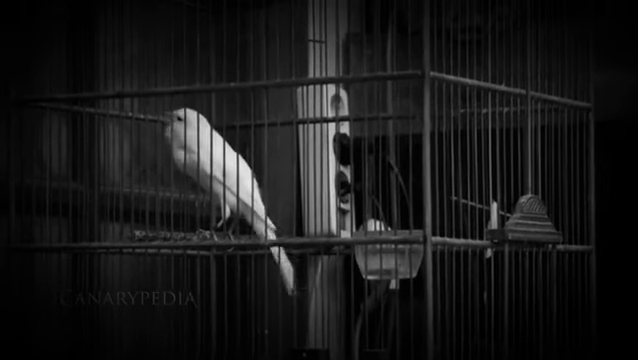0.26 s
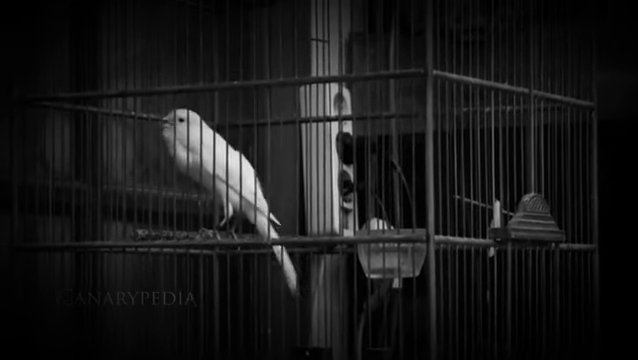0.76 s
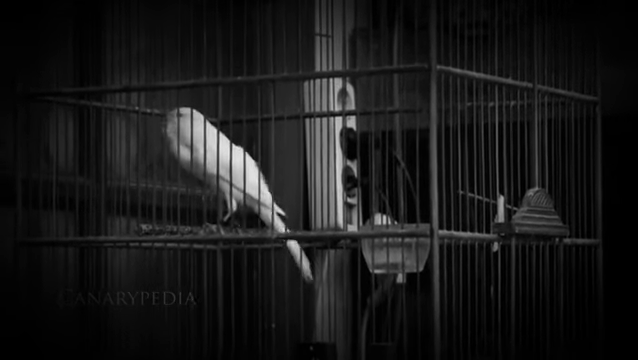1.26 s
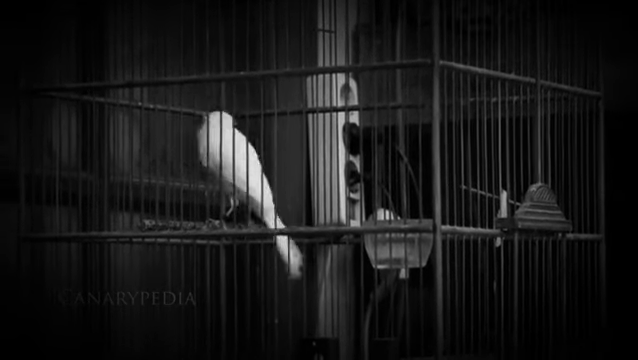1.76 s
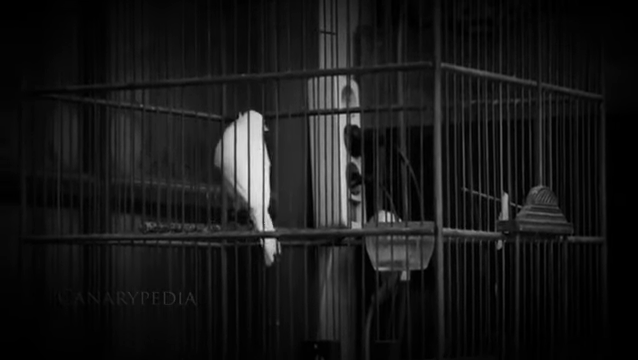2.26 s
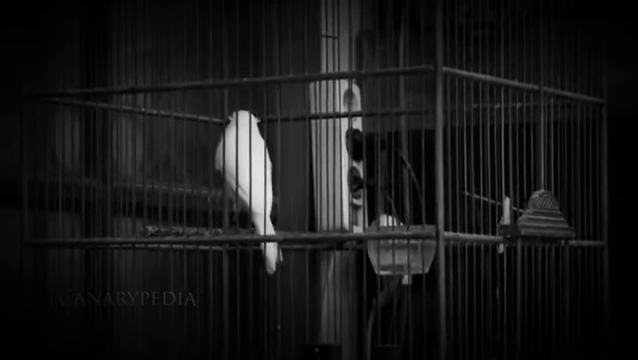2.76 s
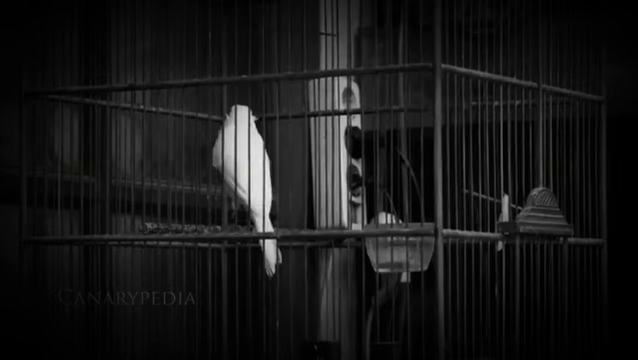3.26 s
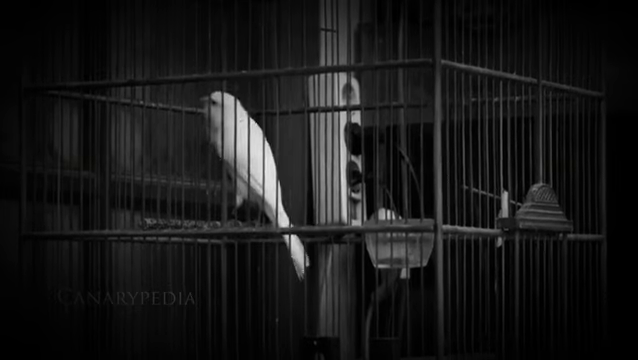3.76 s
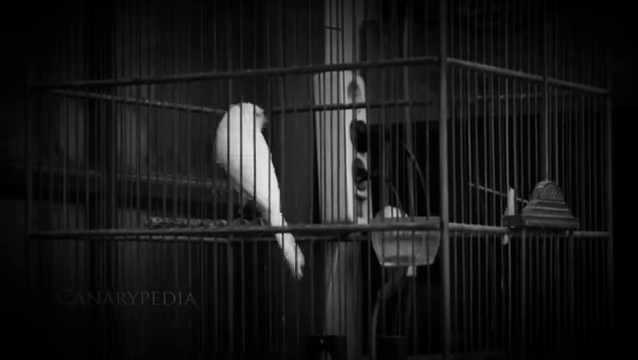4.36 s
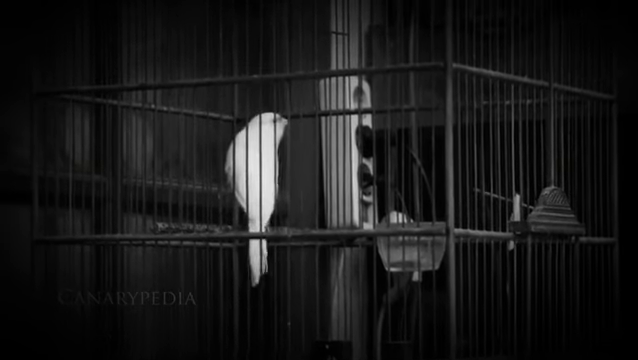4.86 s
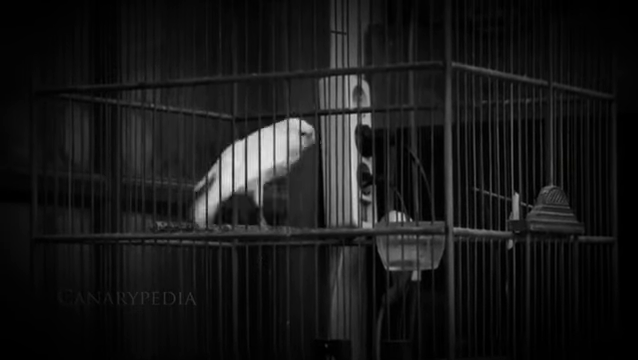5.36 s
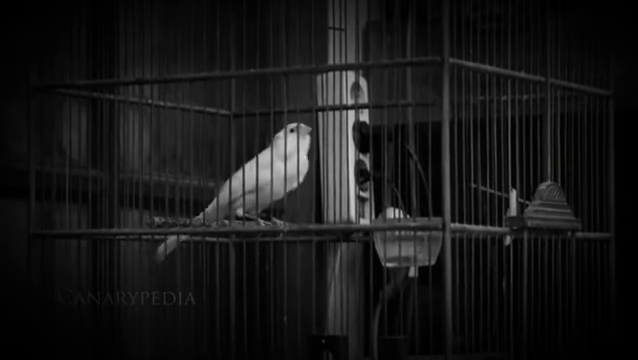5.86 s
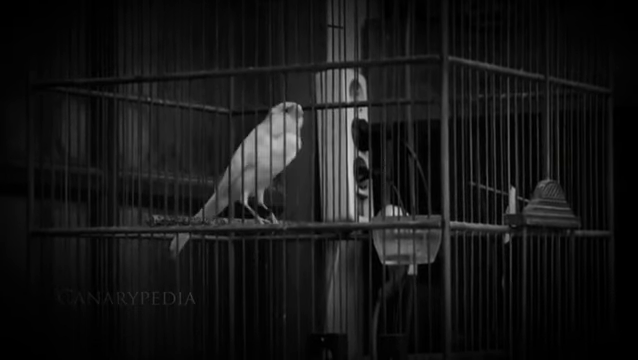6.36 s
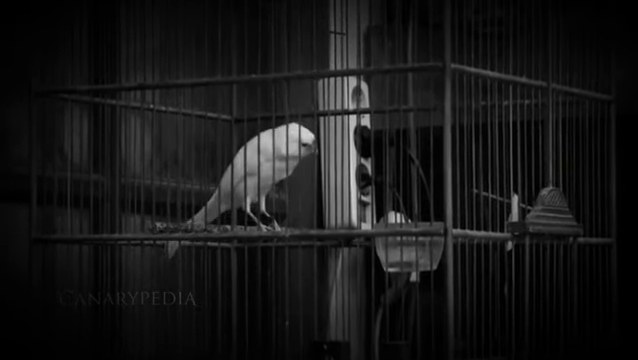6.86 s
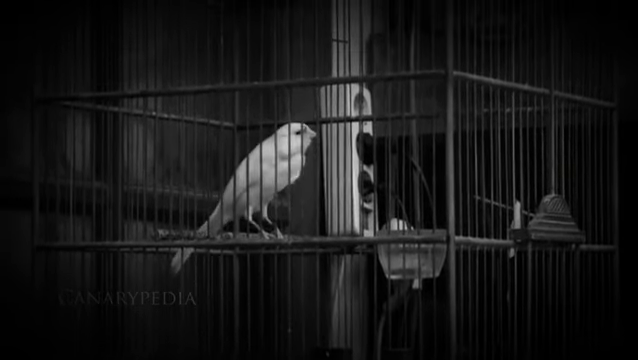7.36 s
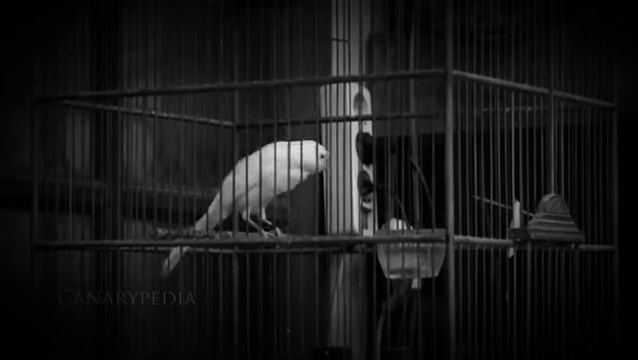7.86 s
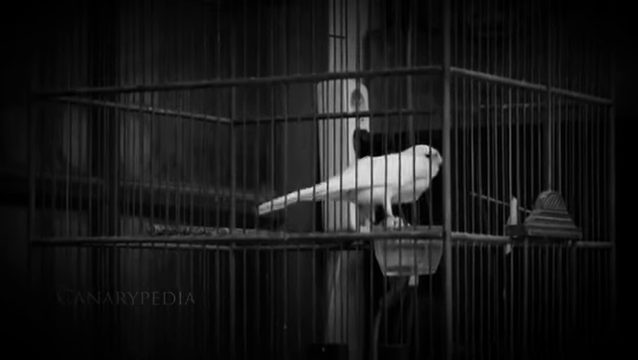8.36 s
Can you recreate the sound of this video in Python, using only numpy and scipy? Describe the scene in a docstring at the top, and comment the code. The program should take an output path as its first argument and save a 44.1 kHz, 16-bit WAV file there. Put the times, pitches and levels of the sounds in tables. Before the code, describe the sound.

Canaries sing in an echoing room, a rolling trill giving way to overlapping whistles, slides and buzzy calls over faint cage thumps.

```python
"""Canaries sing in a bare, echoing bird room: one rolls a falling trill, then many voices overlap in
whistles, slides and harsh buzzy calls, with a soft ticking roll in a lull and four upward slides to end.
Each note is a gliding near-sine, roughened by random pitch shake and rasping overtones.
Cages thump as birds hop on their perches. Shaped noise gives dull rustles, flickering treble chatter,
a far chorus and a low background rumble that swells in the gaps."""
import sys
import numpy as np
from scipy import signal
from scipy.fft import rfft, irfft, next_fast_len
from scipy.io import wavfile
from scipy.ndimage import uniform_filter1d

SR = 44100
rng = np.random.default_rng(int(sys.argv[2]) if len(sys.argv) > 2 else 0)


def pcm_store(signal):
    """Save signal as 16-bit PCM."""
    levels = np.round(np.clip(np.atleast_2d(signal), -1, 1) * 32767)
    wavfile.write(sys.argv[1], SR, levels.astype(np.int16).T)


N = 380141

TRILL_SYLLABLES = [(-0.052, 1), (0.068, -4), (0.182, -6), (0.296, -6.5), (0.412, -8.5), (0.53, -7),
                   (0.649, -6.5), (0.769, -8), (0.885, -8), (1.005, -9), (1.121, -7.5), (1.245, -7),
                   (1.368, -7.5), (1.501, -7.5)]  # the opening roll: t/s, level/dB
TRILL_DROP = [(0, 5800), (.02, 4947), (.046, 4163)]  # the dive that opens each syllable: t/s from its start, f/Hz
BUZZY_CALLS = [(-.01, 0.066, 5080, 4310, -11), (.054, 0.023, 1935, 3830, -12.5),
               (0.243, 0.18, 2760, 2927, -20.5), (0.489, 0.087, 3050, 3150, -24),
               (0.715, 0.094, 2896, 3220, -21.5), (0.888, 0.022, 2966, 3090, -21),
               (1.025, 0.037, 2510, 2630, -26.5), (1.174, 0.096, 2920, 2580, -32),
               (1.49, 0.054, 2780, 2976, -17), (1.737, .032, 5730, 5300, -11.5),
               (1.778, 0.03, 3560, 2466, -10.5), (1.803, 0.12, 3850, 4480, -15),
               (1.901, 0.12, 5500, 4750, -17.5), (1.981, 0.037, 2750, 2468, -17),
               (1.981, 0.094, 3810, 3770, -13), (2.246, 0.11, 4440, 6110, -18),
               (2.292, 0.047, 4600, 3000, -24), (2.345, 0.053, 4230, 4285, -10),
               (2.502, 0.063, 4620, 4420, -16.5), (2.512, 0.13, 2216, 3056, -22),
               (2.538, 0.11, 3680, 5260, -16), (2.669, 0.13, 2970, 4510, -15.5),
               (2.816, 0.11, 3590, 4910, -13), (2.846, 0.023, 2733, 2856, -15),
               (2.89, 0.066, 6860, 6800, -14), (2.934, 0.061, 5870, 4360, -11),
               (3.18, 0.077, 2505, 2226, -24.5), (3.222, .11, 4265, 2973, -22),
               (3.281, .15, 4860, 4440, -16), (3.467, 0.079, 5200, 3870, -23),
               (3.597, 0.14, 3850, 3510, -22.5), (3.743, .12, 2350, 2535, -31.5),
               (3.772, 0.08, 4825, 3800, -15.5), (3.945, 0.1, 3570, 5300, -10),
               (4.101, 0.06, 3946, 3600, -19), (4.161, 0.044, 6000, 5930, -18),
               (4.252, 0.02, 6610, 6540, -12.5), (4.291, 0.1, 3793, 2217, -21),
               (4.349, 0.081, 3720, 5140, -11.5), (4.404, 0.049, 6140, 5800, -10),
               (4.483, 0.077, 3766, 5220, -13), (4.745, 0.093, 3370, 3030, -18),
               (4.861, 0.077, 6070, 5730, -17.5), (4.924, 0.12, 5334, 4535, -13),
               (4.911, 0.055, 3250, 3260, -18), (5.079, 0.089, 4410, 3697, -16),
               (5.144, 0.027, 5260, 5370, -24.5), (5.292, 0.0089, 6620, 4960, -8),
               (5.329, 0.098, 4290, 6025, -9), (5.486, 0.068, 4395, 4180, -9.5),
               (6.283, 0.065, 3507, 3796, -24), (6.514, 0.073, 4810, 4910, -19),
               (6.596, 0.051, 5310, 5590, -18.5), (6.566, 0.13, 3255, 2910, -24),
               (6.642, 0.16, 5200, 3483, -15.5), (6.797, 0.038, 2053, 3015, -17),
               (6.851, 0.046, 4550, 4680, -6.5), (6.935, 0.06, 4025, 2427, -11),
               (6.995, 0.1, 4420, 3730, -14), (7.25, 0.084, 2800, 3137, -19),
               (7.26, 0.068, 5820, 5720, -16), (7.338, 0.1, 4510, 4914, -13),
               (7.498, 0.022, 5510, 5270, -12), (7.695, 0.022, 3705, 3295, -11),
               (7.782, 0.062, 2990, 2720, -16.5), (7.805, 0.15, 4880, 4560, -17.5),
               (8.264, 0.098, 5100, 4630, -24), (8.324, 0.057, 2723, 2525, -23.5),
               (8.445, 0.07, 3706, 4420, -10), (8.537, 0.052, 2466, 2757, -23.5)]  # harsh calls: t/s, length/s, first f/Hz, last f/Hz, level/dB
TWITTER_CURVES = [(0, -37.5, 2996, -11), (1.449, -36.5, 2987, 3), (1.622, -20.5, 3935, -7),
                  (1.75, -38, 3990, 12), (1.9, -20.5, 3543, -14), (2.2, -21, 3379, -6),
                  (2.549, -23, 4080, 7), (2.799, -24, 3813, 5), (3.1, -16.5, 3876, -1),
                  (3.398, -19.5, 4230, 6), (3.55, -30.5, 4180, -38), (3.7, -20, 3705, 3),
                  (4.052, -25, 4346, 3), (4.301, -21, 4298, 8), (4.652, -20, 3715, 1.5),
                  (4.852, -28, 3594, -18), (5.15, -25, 4600, -21), (5.452, -17.5, 4163, -18),
                  (5.62, -43, 3950, 1), (6.0, -43.5, 4186, 2), (6.45, -34.5, 3384, -9),
                  (6.648, -21, 4013, 12), (7.1, -21.5, 4506, -6), (7.199, -44, 4510, 6),
                  (7.449, -30.5, 3614, 15), (7.619, -32.5, 4000, 1), (7.851, -27.5, 4475, -25),
                  (8.1, -31.5, 4410, -4), (8.301, -28.5, 4193, 5.5), (8.62, -14, 3742, 6)]  # the flock's contour: t/s, level/dB, middle f/Hz, overtones/dB
CHATTER_FADER = [(0, -40), (.6, -44.5), (.8, -36), (1.1, -45), (1.6, -60.5), (2.9, -43), (3.55, -62),
                 (4.3, -52), (5.502, -32), (5.75, -89), (6.45, -79), (6.65, -55), (7.15, -70), (7.3, -39),
                 (7.7, -68), (8.62, -66)]  # sizzle above the song: t/s, level/dB
CHATTER_EQ = [(5500, -46), (6500, 13), (9000, 15), (12500, 18.5), (14000, -50)]  # its colour: f/Hz, level/dB
# swells of low background rumble and hum, mostly between calls: t/s, hold/s, rumble level/dB, hum level/dB
RUMBLE_SWELLS = [(.93, .1, -55.5, -77), (2.238, 0.041, -61.5, -42), (2.664, 0.052, -50, -43),
                 (3.11, 0.37, -89, -43), (3.664, 0.15, -37, -34.5), (4.812, 0.094, -38, -43),
                 (5.277, 0.026, -44.5, -37), (5.696, 0.42, -36.5, -45.5), (6.106, 0.32, -35.5, -52.5),
                 (7.202, 0.035, -40, -48), (7.53, 0.35, -43.5, -49.5)]
RUMBLE_EQ = [(76, -17), (130, -6), (183, -4), (252, -7.5), (322, -8), (615, -13.5), (900, -26),
             (1170, -29.5), (1980, -120)]  # the rumble's low body: f/Hz, level/dB
HUM_EQ = [(900, 15), (1050, 6), (1180, 8.5), (1420, 25), (1700, 20), (2200, 31.5), (3000, -18.5)]  # the midrange hum on top of it: f/Hz, level/dB
ROOM_TONE_EQ = [(15, -37), (25, 4), (103, 7.5), (241, -30), (554, -12.5), (1120, -14.5), (1740, -11),
                (1900, -10), (2470, -55), (4180, -120)]  # steady room tone: f/Hz, level/dB
FAR_CHORUS_EQ = [(1900, -30), (2500, -6), (3300, 0), (4200, -8), (4900, -10), (5400, -25), (9000, -40),
                 (13000, -60)]  # the blur of distant birds: f/Hz, level/dB
NOISE_WIDTH = [(50, 0.93), (400, 0.76), (1000, 0.66), (2500, 0.33), (8000, 0.084)]  # stereo image of the noise beds: f/Hz, left-right correlation
RUSTLE_CUES = [(0.188, -37.5, 496, 0.16), (3.03, -35, 1560, 0.21), (4.7, -36.5, 826, 0.57),
               (5.471, -36, 1930, 0.39), (7.121, -45.5, 1030, 0.59), (7.54, -32.5, 586, 0.32),
               (7.66, -41.5, 646, 0.33)]  # short dull rustles: t/s, level/dB, centre f/Hz, t60/s
HOP_CUES = [(0.639, -41), (0.967, -48), (1.11, -45), (1.351, -55), (3.278, -46), (3.585, -39.5),
            (3.705, -47), (4.104, -52), (4.237, -43), (4.506, -48.5), (4.815, -59), (5.113, -41.5),
            (5.482, -50.5), (5.666, -39), (6.223, -34.5), (6.523, -43), (7.503, -41), (7.61, -39.5),
            (7.742, -58), (7.933, -46), (8.14, -44.5)]  # landings on perches: t/s, level/dB
CAGE_MODES = [(181, 3.5, 0.22), (322, 7.5, 0.1), (602, -10, 0.16)]  # the cage's resonances: f/Hz, level/dB, t60/s
CLEAR_WHISTLES = [(1.781, 0.044, 2240, 2465, -15.5), (1.867, 0.042, 2370, 2277, -11.5),
                  (2.31, .045, 2734, 3060, -18), (2.901, 0.042, 4290, 4170, -12),
                  (3.573, 0.029, 2730, 3280, -16.5), (3.766, 0.017, 2870, 3330, -14.5),
                  (3.886, 0.022, 3850, 4280, -6.5), (4.409, 0.029, 4150, 4120, -9),
                  (4.574, 0.14, 4140, 4170, -25), (4.603, 0.061, 2321, 2350, -28.5),
                  (4.973, .051, 4386, 4410, -11.5), (5.246, .04, 3770, 3350, -20),
                  (5.422, .05, 5540, 5540, -12.5), (5.585, 0.14, 3536, 3624, -29.5),
                  (5.802, .12, 3640, 3708, -25.5), (6.62, 0.0066, 3585, 3610, -9.5),
                  (6.762, 0.099, 4180, 4270, -15), (6.877, 0.063, 6006, 5470, -14.5),
                  (6.953, 0.027, 4060, 4050, -8), (7.243, 0.14, 3870, 3900, -21.5),
                  (7.551, 0.23, 3890, 3880, -17), (7.677, 0.045, 2393, 2220, -25.5),
                  (7.924, 0.19, 4920, 4910, -26.5), (8.028, 0.055, 4130, 3140, -12.5),
                  (8.069, 0.061, 3195, 2243, -15), (8.081, 0.058, 4000, 4440, -16),
                  (8.278, 0.078, 4500, 3445, -16.5), (8.361, .11, 3430, 2470, -18),
                  (8.457, 0.1, 2467, 2355, -15.5), (8.508, 0.014, 4030, 4070, -10)]  # clean notes: t/s, length/s, first f/Hz, last f/Hz, level/dB
TICK_CUES = [(5.924, -35), (5.969, -28), (6.017, -26.5), (6.069, -26), (6.119, -22), (6.171, -23.5),
             (6.242, -22.5), (6.301, -19.5)]  # the soft roll in the lull: t/s, level/dB
RISE_CUES = [(7.73, -22.5), (7.924, -17.5), (8.127, -17.5), (8.321, -19)]  # one bird's repeated upward slide: t/s, level/dB
RISE_GLIDE = [(0, 4400), (.065, 6150), (.085, 6550), (.105, 6600)]  # up, then briefly held: t/s from its start, f/Hz
EARLY_ECHOES = [(.0011, -24, -57), (.0027, -15.5, -13), (.0046, -8.5, -21), (.0073, -5, -29),
                (.011, -4, -13)]  # off the nearest walls and cages: delay/s, left level/dB, right level/dB
REVERB_DECAY = [(300, .55), (2500, .54), (4000, .5), (8000, .42), (13000, .36)]  # how long the bare room rings: f/Hz, t60/s
MIC_TILT = [(200, 2), (1000, -0.5), (4000, 0), (8000, 1.5), (12000, 1.5)]  # colour between the microphones: f/Hz, left minus right level/dB


def gain_of(db):
    """Decibels to amplitude."""
    return 10 ** (np.asarray(db) / 20)


def unit_rms(x):
    """Scale a signal to an RMS of one."""
    return x / np.sqrt(np.mean(x ** 2) + 1e-20)


def curve_at(points, hz):
    """Read a curve along a log-frequency axis."""
    f, value = np.transpose(points)
    return np.interp(np.log(hz + 1), np.log(f + 1), value)


def add(mix, s, sound):
    """Drop a sound into the mix at s seconds, trimming any overhang."""
    at = round(s * SR)
    part = mix[max(at, 0):][:len(sound) + min(at, 0)]
    part += sound[max(-at, 0):][:len(part)]


def wobble(steps, length, per_s):
    """Bounded wavering through per_s random steps a second."""
    return 1.5 * np.tanh(np.interp(np.arange(length) * per_s / SR, np.arange(len(steps)), steps))


def note(path, db, buzz_hz, overtones_db):
    """Start time and sound of a near-sine on a (t/s, f/Hz) path; buzz_hz sets the depth of pitch shake."""
    times, pitches = np.transpose(path)
    t = np.arange(times[0], times[-1], 1 / SR)
    steps = rng.standard_normal((3, 400))
    warble, shake, throb = (wobble(row, len(t), per_s) for row, per_s in zip(steps, (170, 700, 110)))
    hz = np.interp(t, times, pitches) + buzz_hz * (.8 * warble + .65 * shake)
    phase = 2 * np.pi * np.cumsum(np.maximum(hz, 2050)) / SR  # the small voice reaches no lower
    rasp = shake * (np.sin(2 * phase) + 0.45 * np.sin(3 * phase) + 0.043 * np.sin(4 * phase))
    voice = np.sin(phase) + gain_of(overtones_db) * rasp
    breath = abs(np.sin(np.pi * np.linspace(0, 1, len(t)))) ** .35
    throb_db = 3.5 * np.tanh(buzz_hz / 150) * throb
    return times[0], gain_of(db + throb_db) * voice * breath


def slide(s, length, first_hz, last_hz, db, buzz_hz, overtones_db):
    """One straight glide; low notes are richer, the overtones losing 24.5 dB per octave of pitch."""
    octaves = np.log2((first_hz + last_hz) / 2 / 2364)
    return note([(s, first_hz), (s + length, last_hz)], db, buzz_hz, overtones_db - 24.5 * octaves)


def trill():
    """Each syllable dives to a briefly held pitch, which sags as the roll goes on."""
    out = np.zeros(N)
    for s, db in TRILL_SYLLABLES:
        landing_hz = 3841 - 151.2 * s
        path = TRILL_DROP + [(0.075, landing_hz), (0.088, landing_hz)]
        add(out, *note(np.add(path, [s, 0]), db, buzz_hz=55, overtones_db=-38))
    return out


def buzzy_calls():
    """Slides made harsh by deep pitch shake and strong overtones."""
    out = np.zeros(N)
    for call in BUZZY_CALLS:
        add(out, *slide(*call, buzz_hz=300.1, overtones_db=4.5))
    return out


def twitter():
    """The flock: short overlapping notes scattered round a middle pitch, some harsher than others."""
    notes_per_s, typical_s = 45, .06
    out = np.zeros(N)
    times, level_db, middle_hz, overtones_db = np.transpose(TWITTER_CURVES)
    share_db = -10 * np.log10(notes_per_s * typical_s / 2)  # overlapping notes share the level
    scatter = np.sqrt(3) * rng.uniform(-1, 1, (int(N / SR * notes_per_s), 6))
    for k, (late, long, high, sweep, loud, harsh) in enumerate(scatter):
        s = (k + late / 4) / notes_per_s
        length = typical_s * 2 ** (long / 2)
        hz = np.interp(s, times, middle_hz) * 2 ** (0.27 * high)
        db = np.interp(s, times, level_db) + share_db + 2 * loud
        bend = 2 ** (.15 * sweep)
        add(out, *slide(s - length / 2, length, hz / bend, hz * bend, db,
                        buzz_hz=240 * 2 ** (harsh / 2), overtones_db=np.interp(s, times, overtones_db)))
    return out


def noise_bed(eq, patchy_db):
    """Coloured stereo noise, wider in the treble, with loud and soft patches drifting through it."""
    hz = np.fft.rfftfreq(1024, 1 / SR)
    a, b, c, d, patches = rng.standard_normal((N // 512 + 5, 513, 5), dtype=np.float32).T
    patches = uniform_filter1d(patches, size=8, axis=0)  # smear across frequency
    patches = unit_rms(uniform_filter1d(patches, size=5, axis=1))  # and across time
    likeness = np.clip(curve_at(NOISE_WIDTH, hz), 0, 1)[:, None]
    left = a + 1j * b
    right = likeness * left + np.sqrt(1 - likeness ** 2) * (c + 1j * d)
    spectra = np.array([left, right]) * gain_of(curve_at(eq, hz)[:, None] + patchy_db * patches)
    return unit_rms(signal.istft(spectra, window="cosine", nperseg=1024, noverlap=512)[1][:, :N])


def chatter():
    """Treble noise that flickers in strong patches above the song."""
    times, db = np.transpose(CHATTER_FADER)
    return gain_of(np.interp(np.arange(N) / SR, times, db)) * noise_bed(CHATTER_EQ, patchy_db=6)


def rumble():
    """Low background noise and its upper hum swell together from a quiet floor, hold and sink back."""
    up_db_per_s, down_db_per_s = 144, 99
    t = np.arange(N) / SR
    low_gain, hum_gain = np.full(N, gain_of(-55.5)), np.full(N, gain_of(-72))
    for s, hold, low_db, hum_db in RUMBLE_SWELLS:
        ramps_db = np.minimum(up_db_per_s * (t - s), down_db_per_s * (s + hold - t))
        swell = gain_of(np.minimum(0, ramps_db))
        low_gain += gain_of(low_db) * swell
        hum_gain += gain_of(hum_db) * swell
    return low_gain * noise_bed(RUMBLE_EQ, patchy_db=4) + hum_gain * noise_bed(HUM_EQ, patchy_db=6.5)


def room_tone():
    """A faint, steady floor of dark air."""
    return gain_of(-50) * noise_bed(ROOM_TONE_EQ, patchy_db=2.5)


def far_chorus():
    """Distant birds blur into a shimmering band of noise."""
    return gain_of(-38) * noise_bed(FAR_CHORUS_EQ, patchy_db=5.5)


def rustles():
    """Dying puffs of noise, each around its own pitch."""
    t, out = np.arange(SR // 3) / SR, np.zeros(N)
    attack = 1 - np.exp(-t / 0.0032)
    for s, db, hz, t60 in RUSTLE_CUES:
        band = signal.butter(2, [hz / 1.12, hz * 1.164], "band", fs=SR, output="sos")
        puff = unit_rms(signal.sosfilt(band, rng.standard_normal(len(t))))
        add(out, s, gain_of(db - 60 * t / t60) * attack * puff)
    return out


def hops():
    """Each landing gives a soft push that rings the cage, tuned a little differently every time."""
    t, out = np.arange(SR // 3) / SR, np.zeros(N)
    attack = 1 - np.exp(-t / 0.002)
    for s, db in HOP_CUES:
        tunings = 1 + 0.033 * rng.uniform(-0.92, 1, len(CAGE_MODES))
        ring = sum(gain_of(mode_db - 60 * t / t60) * np.sin(2 * np.pi * hz * tuning * t)
                   for (hz, mode_db, t60), tuning in zip(CAGE_MODES, tunings))
        add(out, s, gain_of(db + 4.5) * attack * ring)
    return out


def whistles():
    """Clear notes, cleanest when held and a little rougher the further they slide."""
    out = np.zeros(N)
    for s, length, first_hz, last_hz, db in CLEAR_WHISTLES:
        buzz_hz = 25.7 + 0.062 * abs(last_hz - first_hz)
        add(out, *slide(s, length, first_hz, last_hz, db, buzz_hz, overtones_db=-9))
    return out


def ticking():
    """Falling chirps so short that they land as ticks."""
    out = np.zeros(N)
    for s, db in TICK_CUES:
        add(out, *note([(s, 3450), (s + 0.005, 2800)], db, buzz_hz=33, overtones_db=-42))
    return out


def rising_slides():
    """One bird repeats a thin, almost pure upward sweep."""
    out = np.zeros(N)
    for s, db in RISE_CUES:
        add(out, *note(np.add(RISE_GLIDE, [s, 0]), db, buzz_hz=70.5, overtones_db=-48))
    return out


def close_sound(song):
    """Direct sound, a little sooner on the left, with its first echoes."""
    out = np.array([song, np.roll(song, 3)])
    for delay, left_db, right_db in EARLY_ECHOES:
        out += gain_of([[left_db], [right_db]]) * np.pad(song, (round(delay * SR), 0))[:N]
    return out


def reverb(song):
    """Sparse echoes of random sign, dying band by band; three tails take turns as the birds move."""
    out, t = np.zeros((2, N)), np.arange(N) / SR
    for k in range(3):
        taps = np.zeros((2, SR // 2))
        grid = np.arange(200, SR // 2 - 30, 20)
        arrivals = grid + rng.integers(0, 20, (2, len(grid)))
        np.put_along_axis(taps, arrivals, rng.choice([-1., 1.], arrivals.shape), 1)
        hz, age, spectra = signal.stft(taps, SR, nperseg=256)
        decay = gain_of(-60 * age / curve_at(REVERB_DECAY, hz)[:, None])
        tail = signal.istft(spectra * decay, SR, nperseg=256)[1]
        crossfade = np.sqrt(2 / 3) * np.cos(np.pi * (1.7 * t + k / 3))
        out += signal.oaconvolve((song * crossfade)[None], tail / np.linalg.norm(tail[0]), axes=1)[:, :N]
    return out


def scene():
    """The song sits deep in the room and the ticks stay close; thumps and noise layers go in dry."""
    song = trill() + rising_slides() + whistles() + buzzy_calls() + twitter()
    ticks = ticking()
    wet = gain_of(-2.5) * reverb(song + .4 * ticks)
    close = gain_of(-4.5) * close_sound(song) + ticks
    return close + wet + hops() + rustles() + rumble() + room_tone() + far_chorus() + chatter()


def record(dry):
    """Two microphones colour the sides; gain control evens the loudest calls; a low-pass trims the top."""
    threshold_db, squeeze, cutoff_hz = -14.5, 0.83, 13800
    size = next_fast_len(N)
    hz = np.fft.rfftfreq(size, 1 / SR)
    tilt = gain_of(np.outer([.5, -.5], curve_at(MIC_TILT, hz)))
    coloured = irfft(rfft(dry, size) * tilt, size)[:, :N]
    power = uniform_filter1d((coloured ** 2).mean(0), size=900)  # 20 ms detector
    over_db = np.maximum(10 * np.log10(abs(power) + 1e-12) - threshold_db, 0)
    levelled = coloured / gain_of(squeeze * over_db)
    low_pass = signal.firwin(701, cutoff_hz, window=("kaiser", 10), fs=SR)
    return signal.oaconvolve(levelled, low_pass[None], "same", axes=1)


dry = scene()
out = record(dry)
pcm_store(out)
```